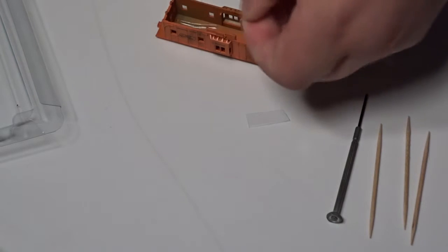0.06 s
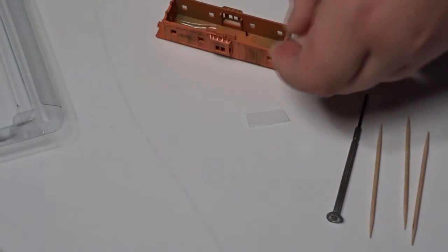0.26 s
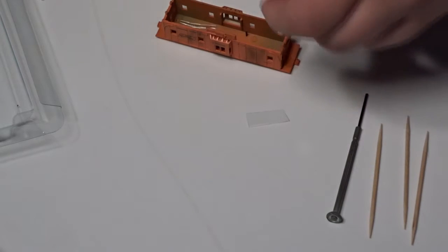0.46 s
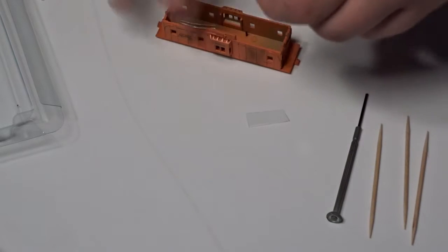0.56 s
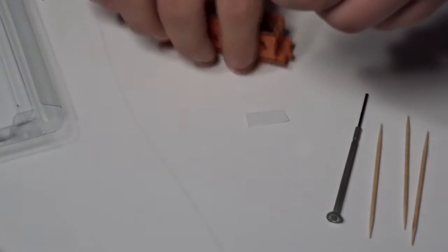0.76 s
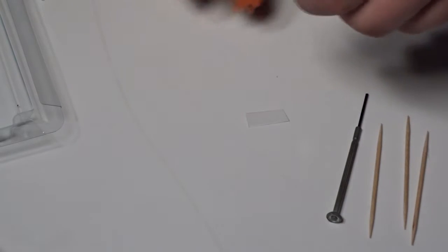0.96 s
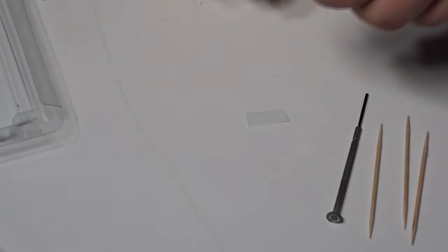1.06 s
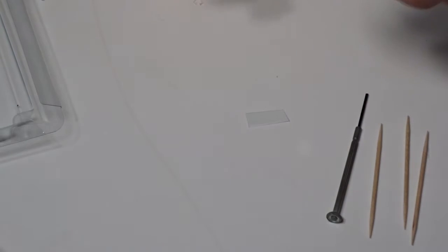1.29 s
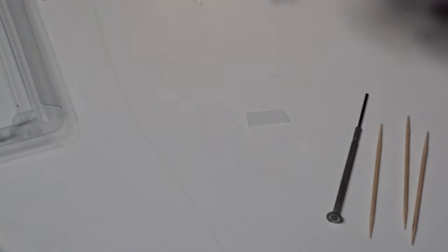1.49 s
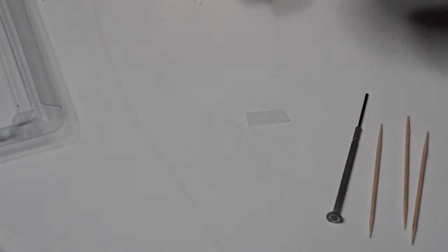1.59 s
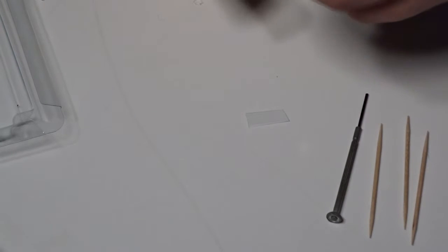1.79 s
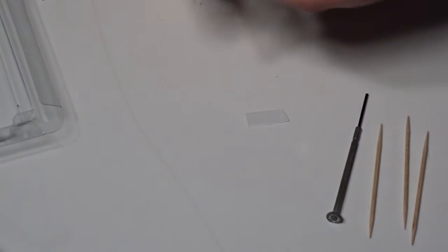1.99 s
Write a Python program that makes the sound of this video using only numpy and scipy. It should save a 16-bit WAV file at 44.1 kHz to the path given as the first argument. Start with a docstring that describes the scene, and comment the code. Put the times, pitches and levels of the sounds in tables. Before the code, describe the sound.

Close up in a quiet room, a small plastic model is set down on a bench with hollow knocks and a brief clatter. It scrapes and slips as it is pushed, followed by a few thin scissor ticks and faint handling.

```python
"""A hollow plastic model coach is set down on a hobby workbench: two knocks, then a short clatter as it
drops flat, each hit ringing the shell and thumping the bench top. Fingers push it across the top, and
it rasps, squeaks and slips. Something small, probably steel scissors, scrapes as it is picked up, then
ticks on thin plastic, its blades ringing. A small, quiet room, heard close and nearly in mono."""
import sys
import numpy as np
from scipy import signal
from scipy.fft import rfft, irfft, next_fast_len
from scipy.io import wavfile

SR = 44100
rng = np.random.default_rng(int(sys.argv[2]) if len(sys.argv) > 2 else 0)


def int16_out(signal):
    """Quantize to a 16-bit WAV file."""
    q = np.round(np.clip(np.atleast_2d(signal).T, -1, 1) * 32767)
    wavfile.write(sys.argv[1], SR, q.astype(np.int16))


N = 90404
T = np.arange(int(0.5 * SR)) / SR  # seconds: the time a hit has to ring out


def amp(db):
    """Decibels to gain."""
    return 10 ** (np.asarray(db) / 20)


def unit_rms(x):
    """Scale a sustained sound to rms 1."""
    return x / np.sqrt(np.mean(x ** 2) + 1e-20)


def unit_energy(x):
    """Scale a one-shot to energy 1."""
    return x / np.linalg.norm(x)


def decay(t, t60):
    """Exponential decay, 60 dB down after t60 seconds."""
    return np.exp(-np.log(1000) * t / t60)


def curve_at(points, hz):
    """Read a curve of (Hz, value) points on a log frequency axis."""
    freqs, values = np.transpose(points)
    return np.interp(np.log(hz + 1), np.log(freqs + 1), values)


def eq(x, points):
    """Minimum-phase EQ through (Hz, dB) points: nothing rings ahead of a transient."""
    size = 2 * next_fast_len(len(x))
    gain = amp(curve_at(points, np.fft.rfftfreq(size, 1 / SR)))
    cepstrum = irfft(np.log(gain), size)
    cepstrum[1:size // 2] *= 2
    cepstrum[size // 2 + 1:] = 0
    return irfft(rfft(x, size) * np.exp(rfft(cepstrum)), size)[:len(x)]


def place(out, start, sound):
    """Mix a stereo sound in at a start time in seconds."""
    i = round(start * SR)
    out[:, i:i + sound.shape[1]] += sound[:, :N - i]


def stereo(mid, side):
    """Mid and side to left and right."""
    return np.array([mid + side, mid - side])


def ring(modes, vary_db=2):
    """Damped modes of alternating polarity, struck a little differently each time."""
    partials = ((-1) ** k * amp(db + vary_db * rng.standard_normal())
                * np.sin(2 * np.pi * hz * T) * decay(T, t60) for k, (hz, db, t60) in enumerate(modes))
    return unit_energy(sum(partials))


def snap(colour, t60, scatter_db):
    """A hard contact: one pulse and a noise burst standing for dense, short resonances."""
    burst = amp(scatter_db) * unit_energy(rng.standard_normal(len(T)) * decay(T, t60))
    burst[0] += 1
    return unit_energy(eq(burst, colour))


def friction(grains_per_s=2500, spread_db=5.5):
    """A dense run of tiny slips of uneven size."""
    grains = (rng.random(N) < grains_per_s / SR) * rng.choice([-1, 1], N)
    return unit_rms(grains * amp(spread_db * rng.standard_normal(N)))


def stroke(peak, attack, release):
    """Pressure builds to a peak and lets go."""
    t = np.arange(N) / SR - peak
    return np.where(t < 0, np.exp(-(t / attack) ** 2), np.exp(-np.abs(t) / release))


def bowed(modes):
    """Friction keeps a body's modes sounding."""
    return unit_rms(signal.oaconvolve(friction(), ring(modes)[:SR // 6])[:N])


# Colour of the room tone. Each row: frequency in Hz, gain in dB.
ROOM_TONE_EQ = [(15, -51), (25, -4), (122, -4), (221, -10), (253, -8.5), (274, -11.5), (313, -9.5),
                (469, -9.5), (826, -18.5), (1080, -22.5), (1900, -26.5), (2230, -20.5), (5280, -24),
                (8580, -18), (15500, -24.5)]
# Width of the room tone. Each row: frequency in Hz, side gain in dB.
ROOM_TONE_WIDTH = [(60, -15), (130, -5), (290, 1), (640, 4.5), (1410, 5), (3100, -0.5), (6820, -13.5),
                   (15000, -7.5)]
# Fader ride on the hiss. Each row: time in seconds, level offset in dB.
HISS_RIDE = [(0, 4.5), (.11, 3.5), (.17, 2), (.6, 5.5), (1.0, 5.5), (1.4, 7.5), (1.599, -2), (1.72, -1.5),
             (1.84, -1), (2.05, 1)]

def room_tone(low_db=-65.5, hiss_db=-70.5):
    """A steady bed of low room noise under a hiss whose level drifts."""
    mid, side = (eq(rng.standard_normal(N), ROOM_TONE_EQ) for _ in range(2))
    air = stereo(mid, eq(side, ROOM_TONE_WIDTH))
    low = signal.sosfiltfilt(signal.butter(2, 1500, fs=SR, output="sos"), air)
    ride_db = np.interp(np.arange(N) / SR, *np.transpose(HISS_RIDE))
    return amp(low_db) * unit_rms(low) + amp(hiss_db + ride_db) * unit_rms(air - low)


# The dull colour of a brushing hand. Each row: frequency in Hz, gain in dB.
HAND_EQ = [(30, -4.5), (120, -5), (220, -12), (350, -5), (560, 2.5), (800, -16.5), (1100, -11.5),
           (1500, -28.5), (6000, -29), (16000, -41.5)]
# Hand moves. Each row: peak time, attack and release in seconds, level in dB.
HAND_MOVES = [(.08, 0.093, 0.11, -69), (1.0, 0.34, 0.16, -60.5), (1.26, 0.214, 0.041, -66),
              (1.73, 0.037, 0.058, -74)]

def hands():
    """Hands shift on the bench in soft swells of friction."""
    brush = unit_rms(eq(friction(), HAND_EQ))
    return brush * sum(amp(db) * stroke(peak, attack, release) for peak, attack, release, db in HAND_MOVES)


# Low modes of the bench top. Each row: pitch in Hz, relative level in dB, 60 dB decay in seconds.
BENCH_MODES = [(146, -14, 0.11), (200, -3, 0.042), (236.5, -1.5, 0.059), (304, -8, 0.094)]
# Hollow modes of the plastic shell. Each row: pitch in Hz, relative level in dB, 60 dB decay in seconds.
SHELL_MODES = [(331, -5.5, 0.044), (415.4, -2, 0.033), (506, 0, 0.036), (576, -2.5, .04), (655, -4, 0.032),
               (805, -8.5, 0.02), (978, -11, .04), (1155, -9, 0.016)]

def bench_and_shell(thump_db, shell_db):
    """The bench top gives way under a blow and swings back, its modes in phase, while the shell rings."""
    thump = sum(amp(db) * np.sin(2 * np.pi * hz * T) * decay(T, t60) for hz, db, t60 in BENCH_MODES)
    return amp(thump_db) * unit_energy(thump) + amp(shell_db) * ring(SHELL_MODES)


def radiated(x, low_cut_hz=142):
    """The deepest part of a bench vibration does not reach the air."""
    return signal.sosfilt(signal.butter(4, low_cut_hz, "high", fs=SR, output="sos"), x)


# The shell's midrange clack and its edge's sharp click. Each row: frequency in Hz, gain in dB.
CLACK_EQ = [(40, -31), (110, -10), (300, -1), (600, 2.5), (1100, -2), (1450, -5), (1950, -5.5), (2400, -6),
            (3100, -6.5), (4200, -15.5), (8000, -17.5), (16000, -29.5)]
CLICK_EQ = [(300, 9.5), (2000, -13), (4000, -15.5), (5500, 1.5), (6700, -3), (8200, 9), (10000, -0.5),
            (11700, -8), (14000, -1), (16500, -35)]
# The coach lands. Each row: start in seconds, then thump, shell, clack and click levels in dB.
COACH_HITS = [(0.2014, -2, -5, -7.5, -18.5), (0.2826, 0, -4.5, -5, -19), (.3931, 0, -6, -10.5, -26),
              (.3955, -2, 2.5, -2.5, -1.5), (.4052, 6.5, -2.5, -9, -29.5), (0.4076, -11, -4, -17, -12),
              (0.426, -1.5, -0.5, -6, -30), (0.4429, -1.5, -4, -4.5, -4.5)]

def coach_knocks():
    """Each landing thumps the bench, clacks the hollow shell and clicks at its edge."""
    out = np.zeros((2, N))
    for start, thump_db, shell_db, clack_db, click_db in COACH_HITS:
        body = bench_and_shell(thump_db, shell_db)
        clack = amp(clack_db) * snap(CLACK_EQ, t60=0.015, scatter_db=2)
        click = amp(click_db) * snap(CLICK_EQ, t60=0.0095, scatter_db=-4)
        place(out, start, in_room(click - radiated(body + clack)))
    return out


# The coach drags. Each row: peak time, attack and release in seconds, then shell, bench and crunch in dB.
COACH_DRAGS = [(.328, .02, 0.037, -38.5, -44, -53), (.422, 0.019, .02, -34, -28, -33),
               (0.741, 0.022, 0.021, -58.5, -60.5, -64), (.772, 0.0096, .02, -44, -51, -67),
               (0.89, 0.034, 0.017, -48.5, -50, -67.5)]

def coach_chatter():
    """The coach chatters along the top: crunchy friction that excites both shell and bench."""
    out = np.zeros(N)
    shell, bench = bowed(SHELL_MODES), bowed(BENCH_MODES)
    crunch = unit_rms(eq(friction(), CLACK_EQ))
    for peak, attack, release, shell_db, bench_db, crunch_db in COACH_DRAGS:
        chatter = amp(shell_db) * shell + amp(bench_db) * bench + amp(crunch_db) * crunch
        out += radiated(stroke(peak, attack, release) * chatter)
    return out


# The bright colour of a scrape. Each row: frequency in Hz, gain in dB.
RASP_EQ = [(300, -27.5), (1500, -21), (3400, -20), (4700, -10.5), (6500, -10), (8300, 2.5), (10700, -1.5),
           (12200, -12), (14500, -5), (16500, -20)]
# Sliding strokes. Each row: peak time, attack and release in seconds, rasp level in dB,
# squeak pitch in Hz, squeak level in dB.
SCRAPE_STROKES = [(.565, 0.084, .018, -57, 7500, -61), (0.769, 0.0048, .02, -41.5, 5800, -43.5),
                  (0.784, 0.0051, 0.01, -54, 1214, -52), (0.897, .04, .03, -57, 1005, -45),
                  (.904, .035, 0.0074, -44.5, 8170, -45), (1.02, .08, 0.081, -77, 2050, -65.5),
                  (1.03, 0.11, 0.084, -77, 3600, -69), (1.095, 0.014, 0.0067, -61, 5590, -63),
                  (1.124, .002, .005, -55, 9650, -52), (1.345, 0.027, 0.021, -65, 8200, -73.5),
                  (1.695, 0.028, 0.019, -68.5, 5150, -74), (1.750, 0.011, 0.023, -63, 5360, -63),
                  (1.794, .015, 0.017, -68.5, 5460, -67), (1.94, 0.057, 0.18, -68.5, 7900, -77.5)]

def scrapes(squeak_decay_cycles=30):
    """Sliding surfaces rasp, and their friction drives one narrow resonance into a squeak."""
    out = np.zeros(N)
    rasp = unit_rms(eq(friction(), RASP_EQ))
    for peak, attack, release, rasp_db, squeak_hz, squeak_db in SCRAPE_STROKES:
        squeak = bowed([(squeak_hz, 0, squeak_decay_cycles / squeak_hz)])
        out += stroke(peak, attack, release) * (amp(rasp_db) * rasp + amp(squeak_db) * squeak)
    return out


# Small bumps during the push. Each row: start in seconds, then thump, shell and click levels in dB.
COACH_BUMPS = [(0.7636, -22, -10, -29), (.7775, -20, -18, -26.5), (0.7965, -40, -26, -23),
               (.8120, -21.5, -14.5, -15), (0.8517, -15.5, -13, -15.5), (0.8591, -24, -30, -19),
               (0.869, -17.5, -32, -35), (.8970, -17.5, -21, -31)]

def coach_slips():
    """The pushed coach catches and slips, each time with a light bump and a raspy click."""
    out = np.zeros((2, N))
    for start, thump_db, shell_db, click_db in COACH_BUMPS:
        bump = radiated(bench_and_shell(thump_db, shell_db))
        click = amp(click_db) * snap(RASP_EQ, t60=0.018, scatter_db=6.5)
        place(out, start, in_room(bump + click))
    return out


# Modes of the steel blades. Each row: pitch in Hz, relative level in dB, 60 dB decay in seconds.
BLADE_MODES = [(2598, -14.5, 0.0204), (4716, -12, 0.026), (7230, -7.5, 0.033), (8140, -16.5, 0.058),
               (8160, 8, 0.019), (8850, 0.5, 0.0073), (9850, -11, .025), (10780, -6.5, 0.027)]
# The thin colour of a tick. Each row: frequency in Hz, gain in dB.
TICK_EQ = [(200, -19), (1050, -4), (1500, -16), (2000, -5), (2700, -8), (3600, -5), (5800, -6.5), (7400, 2),
           (8600, -3.5), (9900, 0), (12500, -8), (16500, -14)]
# Scissor contacts. Each row: start in seconds, tick level in dB, blade ring level in dB.
SCISSOR_HITS = [(0.91, -29.5, -5.5), (0.915, -20, -28.5), (1.1241, -37.5, -31), (1.1947, -15.5, -24),
                (1.2986, -26, -40), (1.8650, -41, -61)]

def scissors():
    """Short ticks that set the steel blades ringing."""
    out = np.zeros((2, N))
    for start, tick_db, ring_db in SCISSOR_HITS:
        tick = amp(tick_db) * snap(TICK_EQ, t60=0.011, scatter_db=2)
        place(out, start, in_room(tick + amp(ring_db) * ring(BLADE_MODES)))
    return out


# Length of the room's tail. Each row: frequency in Hz, 60 dB decay in seconds.
REVERB_DECAY = [(100, 0.54), (400, 0.34), (1500, 0.55), (5000, 0.47), (9000, 0.05), (16000, 0.53)]
# Colour of the reverb. Each row: frequency in Hz, gain in dB.
REVERB_EQ = [(100, -8.5), (400, -7), (1500, -7.5), (5000, -8), (9000, -10), (16000, -11)]

def reflections(early_delay_s=0.009, early_t60_s=0.15, tail_attack_s=0.0027):
    """Early echoes from bench and wall, and a tail that dies away band by band."""
    hz, t, noise = signal.stft(rng.standard_normal(len(T)), SR, nperseg=256)
    t60 = curve_at(REVERB_DECAY, hz)[:, None]
    equal_energy = np.sqrt(2 * np.log(1000) / (t60 * SR))
    tail = signal.istft(noise * decay(t, t60) * equal_energy, SR, nperseg=256)[1][:len(T)]
    tail *= np.minimum(T / tail_attack_s, 1)
    early = unit_energy(rng.standard_normal(len(T)) * decay(T, early_t60_s) * (T > early_delay_s))
    return eq(early + tail, REVERB_EQ)


# Width of the reverb and of the direct sound. Each row: frequency in Hz, side gain in dB.
REVERB_WIDTH = [(60, -24.5), (170, -41), (400, -20.5), (1000, -10.5), (2500, -10.5), (5000, -21.5),
                (9000, -16), (15000, -11)]
DIRECT_WIDTH = [(100, -52), (500, -27), (1500, -24), (2800, -18), (5000, -28), (9000, -21), (15000, -12)]

def in_room(direct):
    """A mono sound and the room's answer, in narrow stereo."""
    mid, side = (signal.fftconvolve(direct, reflections())[:len(direct)] for _ in range(2))
    return stereo(direct + mid, eq(side, REVERB_WIDTH) + eq(direct, DIRECT_WIDTH))


def scene():
    """Everything on the bench, panned a touch to the left, over the room tone."""
    hits = coach_knocks() + coach_slips() + scissors()
    sliding = in_room(hands() + coach_chatter() + scrapes())
    return (hits + sliding) * amp([[0.1], [-0.1]]) + room_tone()


def record(dry, top_hz=16000):
    """A brick-wall high cut on the whole mix."""
    size = next_fast_len(N + SR // 2)
    passband = np.fft.rfftfreq(size, 1 / SR) < top_hz
    return irfft(rfft(dry, size) * passband, size)[:, :N]


dry = scene()
out = record(dry)
int16_out(out)
```